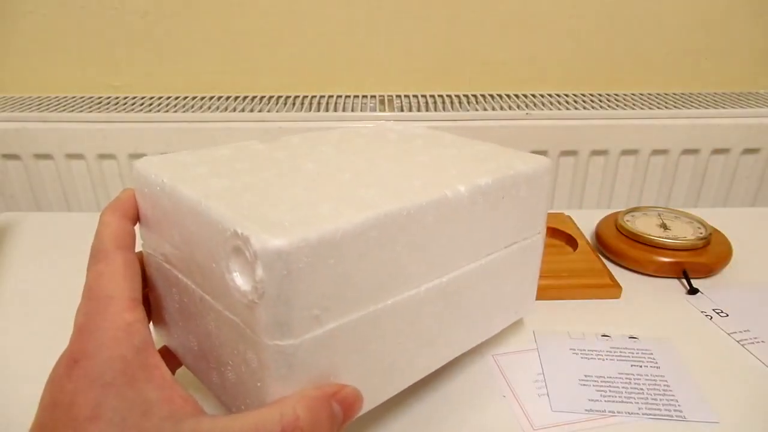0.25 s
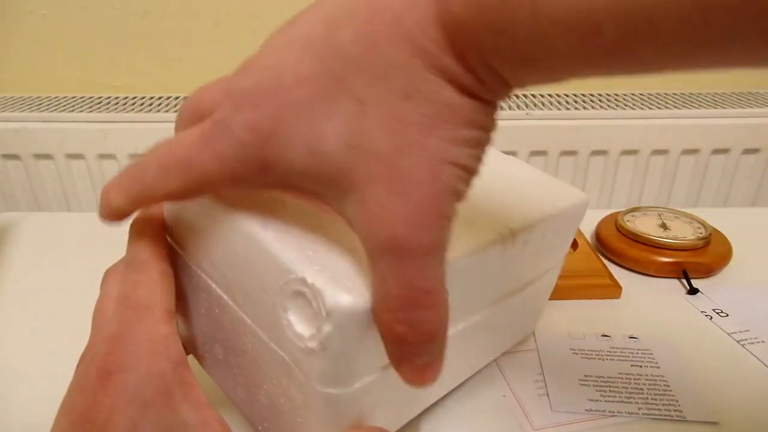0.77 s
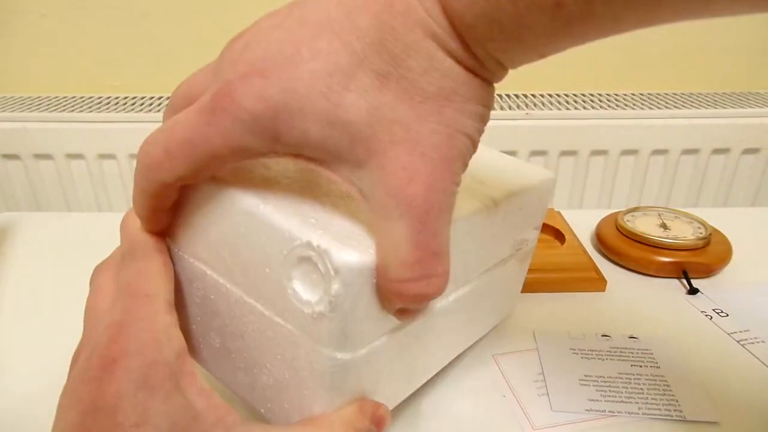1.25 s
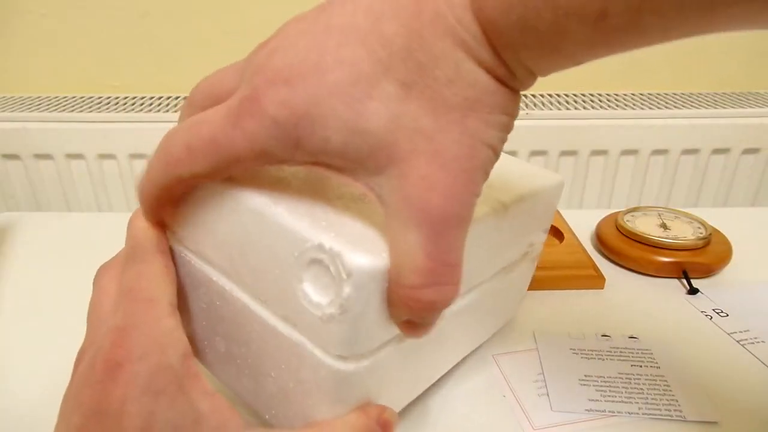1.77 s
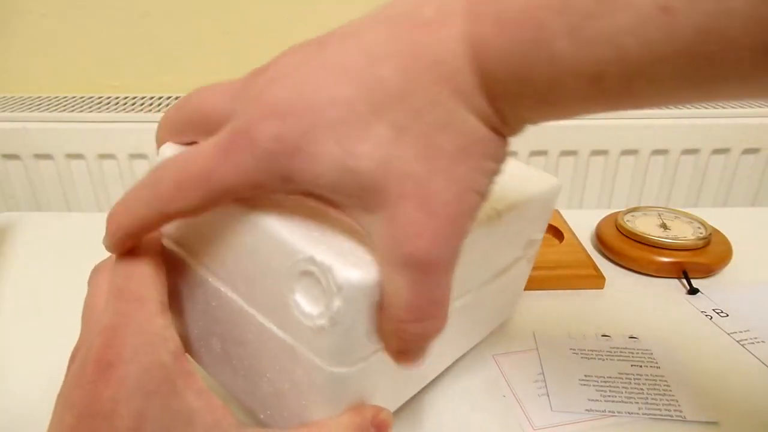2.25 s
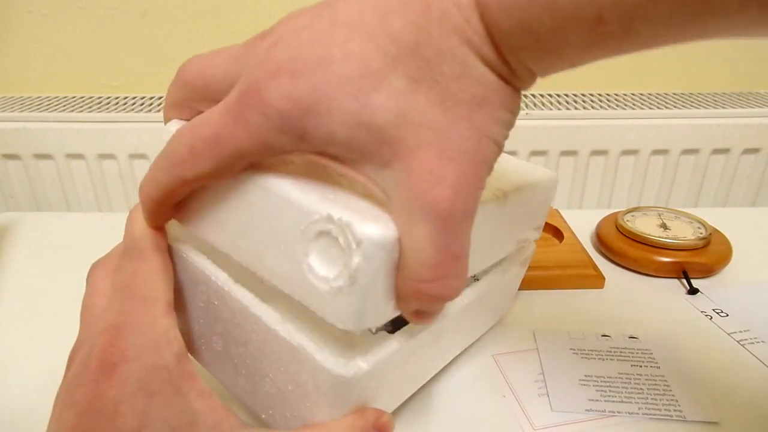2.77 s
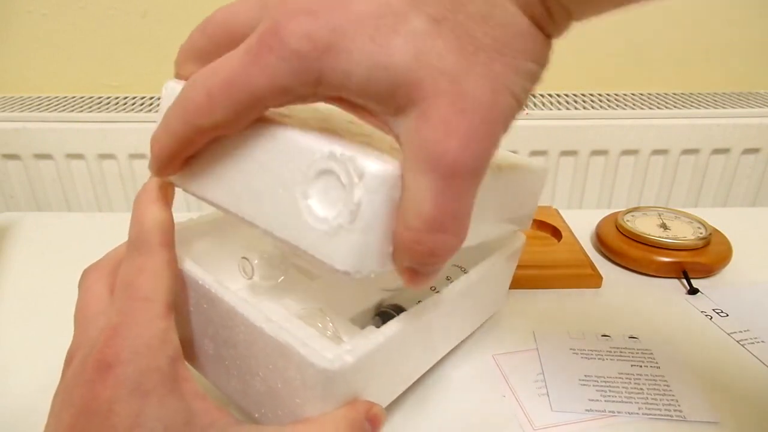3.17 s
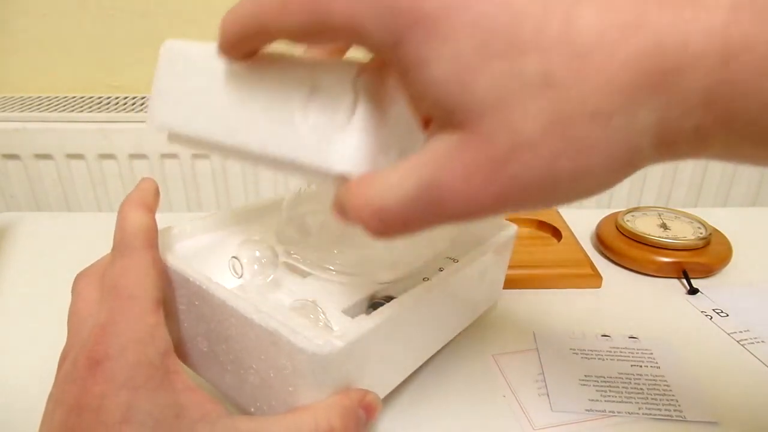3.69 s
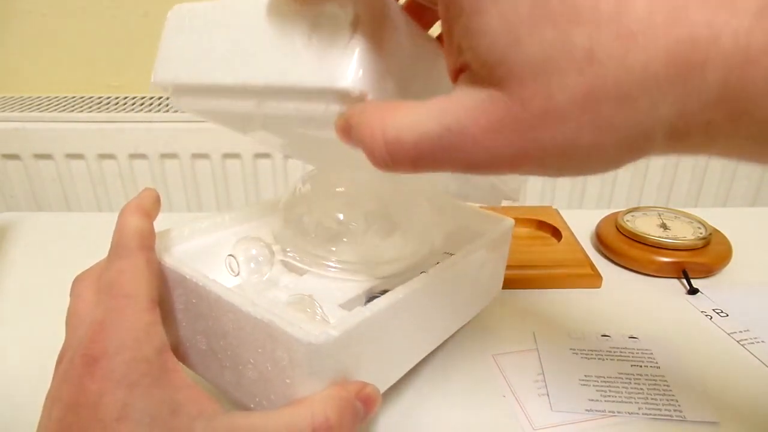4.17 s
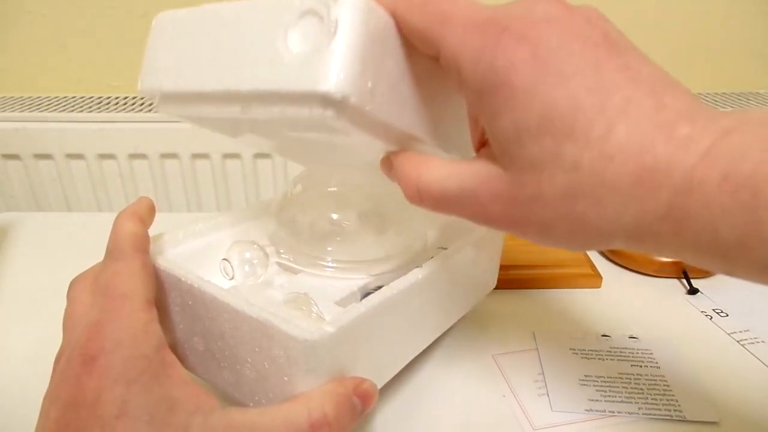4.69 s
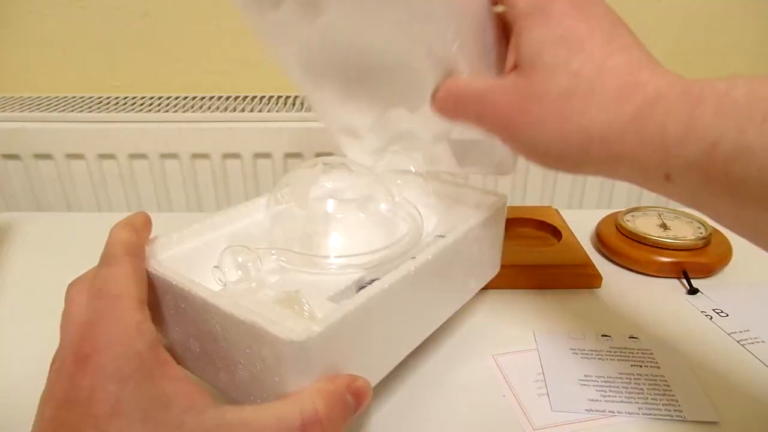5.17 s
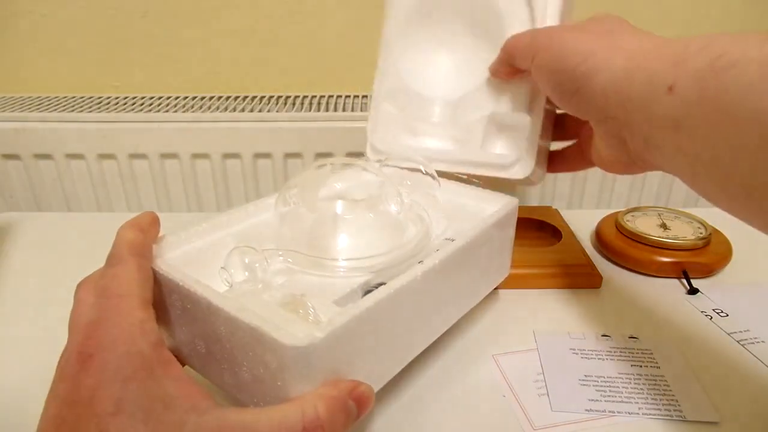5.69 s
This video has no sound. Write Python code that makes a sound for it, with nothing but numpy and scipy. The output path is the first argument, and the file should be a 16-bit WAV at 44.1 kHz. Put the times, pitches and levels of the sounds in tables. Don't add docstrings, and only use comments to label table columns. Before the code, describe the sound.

Close-up foam packing box being opened indoors: sharp dry cracks, scratchy squeaking rub, hollow knocks, and one overloaded loud snap.

```python
import sys
import numpy as np
from scipy import signal
from scipy.io import wavfile
from scipy.ndimage import uniform_filter1d, minimum_filter1d

SR = 44100
rng = np.random.default_rng(int(sys.argv[2]) if len(sys.argv) > 2 else 0)


def volts_from_decibels(level):
    exponent = np.asarray(level, float) / 20
    return 10 ** exponent


def output_pcm(signal):
    pcm = np.clip(np.atleast_2d(signal).T, -1, 1) * 32767
    wavfile.write(sys.argv[1], SR, np.round(pcm).astype(np.int16))


N = 261513


def in_time(rows):
    s, *columns = np.transpose(rows)
    return [np.interp(np.arange(N) / SR, s, column) for column in columns]


def at_hz(points, hz):
    point_hz, value = np.array(points).T
    return np.interp(np.log(hz), np.log(point_hz), value)


def rms_one(x):
    return x / np.sqrt(np.mean(x ** 2) + 1e-20)


def band(x, low_hz, high_hz):
    sos = signal.butter(2, [low_hz, min(high_hz, .45 * SR)], "band", fs=SR, output="sos")
    return signal.sosfilt(sos, x)


def drift(rate):
    r = np.exp(-2 * np.pi * rate / SR)
    wander = signal.lfilter([1], [1, -2 * r, r * r], rng.standard_normal(N + SR))
    return rms_one(wander[SR:])


def colour(x, spectrum, patchy_db=0):
    edges = np.geomspace(spectrum[0][0], spectrum[-1][0], num=10)
    total = 0
    for k, (low_hz, high_hz) in enumerate(zip(edges, edges[1:])):
        level_db = at_hz(spectrum, np.sqrt(low_hz * high_hz)) + patchy_db * drift(5.3)
        total = total + volts_from_decibels(level_db) * band(x[k % 2], low_hz, high_hz)
    return rms_one(total)


def resonance(x, hz, width_hz):
    r = np.exp(-np.pi * width_hz / SR)
    poles = [1, -2 * r * np.cos(2 * np.pi * hz / SR), r * r]
    return signal.lfilter(np.array([1, 0, -1]) * (1 - r * r) / 2, poles, x)


def add(track, s, piece):
    at = round(s * SR)
    track[at:at + len(piece)] += piece[:N - at]


def blows(rows, soft_ms):
    t, out = np.arange(SR // 4) / SR, np.zeros(N)
    for s, db, hz, t60 in rows:
        contact = 1 - np.exp(-t * 1000 / soft_ms)
        ring = np.sin(2 * np.pi * hz * t) * volts_from_decibels(-60 * t / max(t60, .01)) * contact
        add(out, s, volts_from_decibels(db) * ring)
    return out


# (frequency [Hz], level [dB])
HISS = [(25, -3), (60, -6), (200, -7), (560, -4.5), (1000, -15), (2200, -11), (4500, -14), (8000, -12.5),
        (13000, -22.5)]


def room_hiss():
    return volts_from_decibels(-62) * colour(rng.standard_normal((2, N)), HISS)


# (frequency [Hz], time [s])
ROOM_T60 = [(150, 0.5), (400, 0.3), (1000, 0.31), (2800, 0.32), (6000, 0.35), (12000, 0.34)]
# (frequency [Hz], level [dB])
ROOM_COLOUR = [(100, 2.5), (400, 4), (900, -0.5), (1800, -2.5), (3500, -5), (5200, 0), (7000, -3.5),
               (9500, -1), (13000, -1)]


def room(x):
    t, edges = np.arange(SR // 2) / SR, np.geomspace(60, 14000, num=15)
    noise = rng.standard_normal((2, len(t)))
    tail = np.zeros(len(t))
    for k, (low_hz, high_hz) in enumerate(zip(edges, edges[1:])):
        middle_hz = np.sqrt(low_hz * high_hz)
        level_db = at_hz(ROOM_COLOUR, middle_hz) - 60 * t / at_hz(ROOM_T60, middle_hz)
        tail += band(noise[k % 2], low_hz, high_hz) * volts_from_decibels(level_db)
    tail *= 1 - np.exp(-np.maximum(t - .0075, 0) / .007)
    return signal.fftconvolve(x, tail / np.sqrt(np.sum(tail ** 2)))[:N]


def wall_slap(x):
    delay_s, smear_s, level_db = 0.0094, 0.0011, -12.5
    t = np.arange(SR // 25) / SR - delay_s
    scatter = rng.standard_normal(len(t)) * np.exp(-.5 * (t / smear_s) ** 2)
    echo = signal.fftconvolve(x, scatter / np.linalg.norm(scatter))[:N]
    return volts_from_decibels(level_db) * band(echo, 1200, 8000)


# (time [s], peak [dB])
THUMPS = [(0.34, -35), (0.891, -40), (1.492, -23), (1.72, -42), (3.244, -47), (3.364, -45), (4.219, -52),
          (4.289, -43), (4.468, -39), (5.436, -33.5), (5.614, -45), (5.789, -38)]


def table_thumps():
    rows = []
    for s, db in THUMPS:
        rows += [(s, db + 1.5, 42, .035), (s, db - 3.5, 80, .035)]
    return blows(rows, soft_ms=1.1)


# (time [s], peak [dB], pitch [Hz])
TAPS = [(0.857, -26, 900), (0.874, -28.5, 910), (0.93, -29.5, 895), (0.999, -28, 847), (1.051, -26.5, 850),
        (1.072, -32.5, 910), (1.099, -38.5, 680), (1.099, -36, 850), (1.116, -33.5, 860),
        (1.134, -33.5, 830), (1.144, -35, 820), (1.162, -42.5, 904), (3.122, -26, 994)]


def fingertip_taps():
    return blows([(s, db + 1.5, hz, .03) for s, db, hz in TAPS], soft_ms=0.33)


# (time [s], peak [dB], pitch [Hz], t60 [s])
KNOCKS = [(0.349, -27, 276, 0.13), (0.366, -19, 296, 0.077), (0.399, -26, 305, 0.03),
          (0.428, -31, 228, 0.091), (0.447, -25.5, 288, 0.053), (.466, -34, 256, 0.073),
          (0.898, -23.5, 385, 0.027), (1.494, -4.5, 303, 0.024), (1.721, -16.5, 450, 0.023),
          (2.025, -39.5, 432, 0.031), (2.498, -39, 353, 0.035), (2.964, -40, 434, 0.11),
          (3.658, -35.5, 220, 0.057), (4.172, -40, 250, 0.07), (4.478, -56, 264, 0.08),
          (5.135, -27.5, 186, 0.028), (5.18, -42, 194, 0.1), (5.432, -40.5, 467, 0.057),
          (5.614, -33.5, 294, 0.048), (5.711, -32, 280, 0.043), (5.783, -25.5, 290, 0.024)]
# (time [s], peak [dB], pitch [Hz], t60 [s])
WALL_RINGS = [(0.3467, -19.0, 1350, 0.26), (0.3646, -20, 1300, 0.057), (0.3859, -23, 1060, 0.047),
              (0.405, -32, 1360, 0.063), (.425, -28, 1260, .05), (.43, -29, 1340, 0.056),
              (1.72, -22.5, 995, 0.044), (.44, -34, 545, .1), (.43, -32, 1060, .08), (1.515, -20, 980, .08),
              (1.52, -24, 275, .1), (1.515, -22, 1200, .07), (4.475, -16, 1377, 0.032),
              (.35, -24.5, 540, .12), (0.39, -30.5, 550, 0.21), (.35, -18.5, 1060, .1),
              (.37, -23.0, 980, 0.095), (1.4955, -1.5, 835, 0.025), (1.4965, -15.0, 800, 0.051),
              (1.496, -6.5, 1800, 0.014), (5.433, -12.5, 805, 0.022)]


def box_knocks():
    return blows(KNOCKS + WALL_RINGS, soft_ms=0.93)


# (time [s], peak [dB], pitch [Hz], t60 [s])
PINGS = [(.3475, -13, 3570, 0.04), (.3475, -12, 5710, .025), (.386, -30, 3300, .02), (.9, -21, 3810, 0.047),
         (.9, -14, 5110, 0.021), (.866, -31, 1620, 0.076), (.893, -38, 2480, .03),
         (1.165, -31, 4200, 0.023), (2.929, -39.5, 2890, 0.011), (3.0205, -19, 3480, .02),
         (3.2435, -8.5, 5280, 0.014), (4.247, -29, 4100, 0.017), (4.25, -41, 1110, 0.1),
         (4.2875, -21, 2670, 0.013), (4.329, -19, 6770, 0.013), (3.7705, -25, 2750, 0.015),
         (3.771, -17.5, 3100, 0.0088), (3.2435, -22, 1140, 0.025), (3.245, -17, 5920, 0.03),
         (5.434, -14, 2420, 0.013), (5.434, -3, 4990, 0.0091), (5.8095, -10.5, 5360, 0.015),
         (5.864, -20, 4550, .025), (1.4965, -8, 2700, .02), (1.51, -14, 3200, .03), (1.505, -12, 5600, .03),
         (5.44, -16, 6000, .04), (.348, -16, 9800, .012), (3.27, -24, 5100, .05), (5.766, -26, 2370, 0.017),
         (.9005, -21, 15400, .012), (.9005, -26, 13300, .012), (.9005, -22.5, 10900, .012),
          (.9008, -14.5, 6960, .012), (.862, -26, 10500, 0.033), (.874, -28, 10300, 0.022),
          (3.088, -36, 14000, .015), (3.098, -29, 13700, .02), (3.6, -36, 15400, .02),
          (3.6, -31, 13000, .02), (4.194, -23, 10400, 0.013), (4.1935, -34, 13500, .012),
          (5.367, -23, 13800, .012), (2.252, -45, 9500, 0.014), (.341, -26, 2230, .03),
          (.35, -20, 1720, .03), (.385, -21, 1340, .03), (1.0, -41, 2500, 0.046), (1.04, -37, 2300, .08),
          (1.15, -38, 2450, .02)]


def rim_pings():
    return blows(PINGS, soft_ms=0.16)


# (time [s], contact [dB], weight relative to contact [dB])
HOLD = [(0, -71, 6), (.3, -62, 3.5), (.46, -51, 8), (.8, -50, -4.5), (1.0, -50.5, -0.5), (1.26, -50.5, 0),
        (1.34, -67, 7.5), (2.2, -79, 7.5), (2.4, -60.5, -3.5), (2.62, -65.5, -0.5), (2.75, -89.5, 1.5),
        (2.95, -74, 9), (3.2, -45, -3), (3.4, -46.5, -4), (3.62, -48, -11), (3.9, -57, 0.5),
        (4.16, -71, 17), (4.85, -60.5, 3.5), (4.95, -57, 0), (5.04, -56, -1), (5.12, -59, 8),
        (5.25, -58, 4.5), (5.5, -52.5, -7.5), (5.93, -61, 7)]
# (start [s], length [s], level [dB], relative weight [dB], relative squeak [dB])
STROKES = [(0.397, 0.044, -52.5, -12, 1), (0.589, 0.17, -68.5, -22, 13), (0.874, 0.0058, -38.5, 0.5, 0),
           (0.885, 0.094, -47.5, -30, -26), (1.027, 0.019, -41.5, -3, -16),
           (1.365, 0.0084, -61.5, -5.5, 8.5), (1.486, 0.026, -40, -38, -4),
           (2.319, 0.058, -54.5, -11, -1.5), (2.993, 0.042, -38, -3.5, -7), (3.068, 0.052, -34, -16, -2.5),
           (3.679, 0.0092, -39.5, -3.5, -6), (3.794, 0.057, -41.5, -19, -8), (3.933, 0.07, -38, -9, -5.5),
           (4.088, 0.024, -44, -8.5, -5), (4.208, 0.019, -44, -3, 2.5), (4.306, 0.041, -42, -16, -4),
           (4.417, 0.065, -31.5, -13, -1), (4.49, 0.17, -38, -14.5, 0.8), (4.664, 0.019, -38, -17, -35),
           (4.783, 0.063, -48, -7, -9), (5.367, 0.063, -40.5, -4, -26.5), (0.86, .012, -47, -5, 4),
           (5.452, 0.013, -35.5, -10, -10), (3.659, 0.021, -48.5, -4, -10), (5.818, .02, -41, -13, -8),
           (1.194, 0.043, -56, -14, -8)]


def effort():
    bite_db_per_s, ease_db_per_s, hold_squeak_db = 451.5, 271, -5.5
    palm_s, palm_db, palm_fade_db_per_s = .338, -26, 301.5
    t = np.arange(N) / SR
    contact_db, weight_db = in_time(HOLD)
    gains = volts_from_decibels(contact_db + np.array([0 * t, weight_db, hold_squeak_db + 0 * t]))
    for start, length, db, heavy_db, squeak_db in STROKES:
        near = slice(max(round((start - .25) * SR), 0), round((start + length + .5) * SR))
        before = np.maximum(start - t[near], 0)
        after = np.maximum(t[near] - start - length, 0)
        fall_db = bite_db_per_s * before + ease_db_per_s * after
        gains[:, near] += volts_from_decibels(db - fall_db) * volts_from_decibels(np.array([[0], [heavy_db], [squeak_db]]))
    gains[1] += (t > palm_s) * volts_from_decibels(palm_db - palm_fade_db_per_s * np.abs(t - palm_s))
    return gains


def bead_slips(per_s, spread_db):
    sizes = volts_from_decibels(spread_db * np.minimum(rng.exponential(1, (2, N)), 5))
    signs = rng.choice([-1, 1], (2, N))
    chance = per_s * volts_from_decibels(2.6 * drift(60)) / SR
    return sizes * signs * (rng.random((2, N)) < chance)


# (pitch [Hz], width [Hz], level [dB])
PANEL = [(880, 240, -8), (1660, 150, -4), (2480, 150, -2.5), (3700, 100, -10), (4170, 100, -7),
         (4720, 420, -6), (2740, 280, -21)]
FREED_DB = [-3, -4, -8, 0, 1, -6, 17]


def lid_panel(slips):
    freed_s, waver_db, mix = 2.9, 3 * drift(8.2), 0
    freed = np.arange(N) > freed_s * SR
    for k, (hz, width_hz, db) in enumerate(PANEL):
        level_db = db + np.roll(waver_db, -k * (SR // 2)) + FREED_DB[k] * freed
        ring = resonance(resonance(slips, hz, width_hz), hz, width_hz)
        mix = mix + (-1) ** k * volts_from_decibels(level_db) * ring
    return rms_one(mix)


# (frequency [Hz], level per Hz [dB])
SCRATCH = [(880, -39.5), (1500, 3.5), (1770, -2.5), (2230, 7.5), (2860, -1.5), (3150, 1), (5490, 6),
           (7630, -7.5), (9000, -11.5), (11700, -45.5), (19800, -120)]
# (frequency [Hz], level per Hz [dB])
BODY = [(35, -67.5), (60, -28), (268, -5), (643, -9.5), (800, -6.5), (865, -26), (1380, -5), (2500, -11.5),
        (3250, -34), (5500, -120)]
# (time [s], level relative to scratch [dB])
GRIP = [(0, -30), (.54, -24.5), (.58, -1), (.7, 3.5), (.78, -0.5), (.86, -1), (.92, -12), (.98, -18),
        (1.15, -18), (1.25, -10.5), (3.6, -13), (3.925, -11), (3.945, -1.5), (4.01, 1.5), (4.035, -14),
        (4.11, -9), (4.16, -10), (4.38, -13), (4.42, -9), (4.47, -11), (4.55, -14.5), (5.93, -16)]


def foam_rub():
    scratch, body, squeak = effort()
    slips = bead_slips(4500, spread_db=3.0)
    top = rms_one(band(slips[0], 8580, 12000)) * volts_from_decibels(3.0 * drift(50))
    panel = volts_from_decibels(in_time(GRIP)[0]) * lid_panel(slips[1])
    mix = scratch * (colour(slips, SCRATCH, patchy_db=2.2) + panel)
    mix += body * colour(slips, BODY, patchy_db=2.0)
    mix += squeak * top
    return volts_from_decibels(-1.0 + 1.3 * drift(40)) * mix


# (low [Hz], high [Hz])
CRACK_BANDS = [(3270, 6830), (746, 2330), (1230, 4060), (7250, 11370)]
# (time [s], level [dB])
SEATING = [(.3, 6), (1.4, 14), (1.6, -2.5), (2.6, -5.5), (3.7, -4.5), (4.4, 7.5), (5.3, -11), (5.9, 6.5)]
# (time [s], peak [dB], hollowness [dB], edge [dB], room [dB])
FIRM = [(.3471, -2, -10, -31, -1.5), (.3864, -15.5, 2.5, -31, 2), (.8999, -3, -45, -13.5, -7.5),
        (1.4212, -13.5, -11.5, 7.5, -7), (1.4945, 10, -10.5, -5, -7), (1.5495, -3.5, -1.5, 1.5, -9.5),
        (1.72, -3, -7, -6.5, -11.5), (1.7506, -6, -11, -9.5, -8.5), (2.0278, -11, -10.5, -6, -9),
        (2.4997, -10, -11.5, -6, -7.5), (3.2326, -13.5, -2, 7, -7.5), (3.243, -3, -13.5, -7.5, -5.5),
        (3.7708, -9.5, -25, -4, -8.5), (4.2867, -13, -9, 0, -24.5), (4.293, -17, -3, 2, -14),
        (4.3281, -12, -9.5, 4, -7.5), (4.4772, -5.5, -5.5, -9, -8), (5.3298, -6.5, -3, -1.5, -32),
        (5.3672, -5, -3.5, -1.5, -10), (5.4331, 2.5, -6, -4.5, -10.5), (5.6136, -6.5, 1.5, -2, -11.5),
        (5.7099, -4.5, -5.5, -4, -8.5), (5.7823, -5, -4, -0.5, -13.5), (5.8087, -3, -10, -2, -10),
        (5.8626, -8.5, -12.5, -5, -9.5)]
# (time [s], peak [dB], hollowness [dB])
TICKS = [(0.196, -36.5, -15), (0.3507, -10, -3.5), (0.5549, -16.5, -11.5), (.559, -26, -5),
         (1.1643, -23, -21), (1.378, -30, -31), (1.905, -21, -8.5), (1.966, -29, -6), (2.1152, -32, -6.5),
         (2.3113, -39.5, -20.5), (2.3424, -32.5, 0), (2.4038, -28, -7.5), (2.488, -21, -13),
         (2.595, -26.5, -33), (2.929, -45, -20), (3.1547, -19.5, -3), (3.361, -34, 11), (3.6, -54, -17),
         (3.648, -37, -10), (3.666, -21, -1.5), (4.1934, -20.5, -23), (4.197, -24, -9), (4.2456, -21, -8),
         (4.3625, -24.5, -7), (4.916, -26.5, -7.5), (5.052, -31, -1.5), (5.1089, -20.5, -2),
         (5.235, -29.5, -9), (5.3215, -9, -17), (5.766, -26, -16.5), (5.792, -16, -19)]
# (time [s], peak [dB])
RIP = [
    (1.4916, -11),
    (1.4983, 3),
    (1.5049, 4),
    (1.5076, -6),
    (1.512, -4.5),
    (1.517, -8),
    (1.5262, -7.5),
]
# (time [s], peak [dB])
JUDDER = [(2.957, -36), (2.9669, -8), (2.9785, -8.5), (2.9914, -8.5), (3.01, -8.5), (3.0207, -10.5),
          (3.0294, -14), (3.0387, -13), (3.0484, -23), (3.0723, -14.5), (3.08, -11), (3.088, -16),
          (3.097, -15), (3.1129, -14), (3.125, -23), (3.258, -14), (3.271, -13)]


def foam_cracks():
    t, direct, walls = np.arange(SR // 20) / SR, np.zeros(N), np.zeros(N)
    rows = FIRM + [(*row, -2.5, -6) for row in TICKS]
    rows = rows + [(*row, -4.5, 0, -27.5) for row in RIP]
    rows = rows + [(*row, -13.5, -12.5, -6.5) for row in JUDDER]
    lead = .0025
    for s, peak_db, hollow_db, edge_db, room_db in rows:
        dying = .0025 * (1 + max(peak_db + 4, 0) / 10)
        swell = np.where(t < lead, .17 * t / lead, np.exp(-(t - lead) / dying))
        mid_db = np.interp(s, *np.transpose(SEATING)) + 0.97 * hollow_db
        levels_db = [0, hollow_db, mid_db, edge_db]
        for (low_hz, high_hz), db, sign in zip(CRACK_BANDS, levels_db, [1, 1, -1, -1]):
            noise = rng.standard_normal(len(t))
            piece = band(band(noise * swell, low_hz, high_hz), low_hz / 2, 1.29 * high_hz)
            piece = volts_from_decibels(peak_db + db - 5.5) * piece / np.abs(piece).max()
            add(direct, s - lead + .0003, piece)
            click = sign * band(band(t == 0, low_hz, high_hz), low_hz / 2, 1.26 * high_hz)
            add(walls, s, volts_from_decibels(room_db) * click * np.linalg.norm(piece) / np.linalg.norm(click))
    return direct, walls


def scene():
    hiss, thumps, taps = room_hiss(), table_thumps(), fingertip_taps()
    hollow = box_knocks() + rim_pings()
    scratch = foam_rub()
    direct, walls = foam_cracks()
    tail = room(walls + volts_from_decibels(-14.0) * hollow + volts_from_decibels(-22) * taps + volts_from_decibels(-8.5) * scratch)
    mono = direct + hollow + taps + thumps + scratch + tail + wall_slap(direct) + hiss
    return np.array([mono, mono])


# (start [s], end [s], fade-in [s], depth [dB])
DROPOUTS = [
    (1.259, 1.339, 0.015, -20.5),
    (5.26, 5.314, 0.016, -23),
    (5.3, 5.307, 0.0054, -3),
    (4.272, 4.282, .002, -6),
    (4.145, 4.165, .02, -3),
    (5.83, 5.84, .005, -3),
]


def dropouts(x):
    t, gain_db = np.arange(N) / SR, np.zeros(N)
    for start, end, fade, depth_db in DROPOUTS:
        gain_db += np.interp(t, [start - .001, start, end, end + fade], [0, depth_db, depth_db, 0])
    return x * volts_from_decibels(gain_db)


# (low [Hz], high [Hz], relative share of frames kept [0-1.2], lean to loud frames
STARVED = [(6900, 7300, 1.2, 0, 1), (7600, 8300, 1.2, 0, 1), (8300, 8800, 1.1, -.02, 2),
           (9300, 9700, .98, -.03, 2), (10200, 10800, 1.1, -.02, 1), (10800, 11400, .75, -.08, 3),
           (11400, 11800, .5, .05, 3), (11800, 12300, .7, .2, 2), (12300, 13000, .7, .3, 3),
           (13000, 13700, .3, .3, 3), (13700, 14600, .01, 0, 2), (14600, 16500, 0, 0, 1)]
# (start [s], length [s], top [Hz])
SPARED = [(.865, .045, 16500), (1.9, .11, 13700), (2.03, .1, 13700), (3.07, .06, 14600), (3.59, .03, 16500),
          (3.97, .04, 14600), (4.19, .06, 14600), (4.29, .11, 14600), (4.49, .07, 13700),
          (5.34, .04, 14600)]


def treble_gaps(x):
    hz, s, cells = signal.stft(x, SR, nperseg=1024)
    loud = np.log(np.mean(np.abs(cells) ** 2, axis=0) + 1e-12)
    above = loud - np.median(loud)
    for low_hz, high_hz, share, lean, frames in STARVED:
        luck = np.repeat(rng.random(len(loud)), frames)[:len(loud)]
        push = lean * np.minimum(above, 3 - above * np.sign(lean))
        kept = .8 * np.minimum(share * np.exp(push), 1.2) > luck
        for start, length, top_hz in SPARED:
            kept |= (s > start) & (s < start + length) & (high_hz <= top_hz) & (low_hz > 12000)
        cells[(hz >= low_hz) & (hz < high_hz)] *= kept | (loud > loud.max() - .7)
    cells[hz > 16500] = 0
    x = signal.istft(cells, SR, nperseg=1024)[1][:N]
    level_db = 10 * np.log10(uniform_filter1d(x ** 2, size=60) + 1e-12)
    ahead_db = -minimum_filter1d(-level_db, size=300, origin=-150)
    duck_db = -.8 * np.clip(ahead_db - level_db - 16, 0, 15)
    return x * volts_from_decibels(uniform_filter1d(duck_db, size=40))


# (low [Hz], high [Hz], share of frames [0-1], level [dB])
UNEQUAL = [(20, 700, .04, -24), (700, 1500, .012, -26), (1500, 2200, .04, -20), (2200, 2900, .27, -18),
           (2900, 3700, .18, -18), (3700, 4700, .13, -19), (4700, 5700, .11, -17), (5700, 7000, .1, -17),
           (7000, 8500, .1, -14), (8500, 10500, .1, -13), (10500, 12000, .14, -11),
           (12000, 14500, .12, -10)]


def side_patches(x):
    hz, _, cells = signal.stft(np.roll(x, 40), SR, nperseg=1024)
    gain = np.zeros(cells.shape)
    frames = cells.shape[1]
    for low_hz, high_hz, share, db in UNEQUAL:
        present = np.repeat(rng.random(frames) < share, 2)[:frames]
        gain[(hz >= low_hz) & (hz < high_hz)] = volts_from_decibels(db) * present
    return signal.istft(cells * gain, SR, nperseg=1024)[1][:N]


def top_cut(x):
    return signal.sosfilt(signal.butter(12, 15740, fs=SR, output="sos"), x)


def record(dry):
    bass_cut = signal.butter(1, 45, "high", fs=SR, output="sos")
    x = dropouts(signal.sosfilt(bass_cut, dry[0]))
    x = treble_gaps(np.clip(x, -.99, .99))
    mix = x + side_patches(x) * [[1], [-1]]
    return top_cut(mix)


dry = scene()
out = record(dry)
output_pcm(out)
```